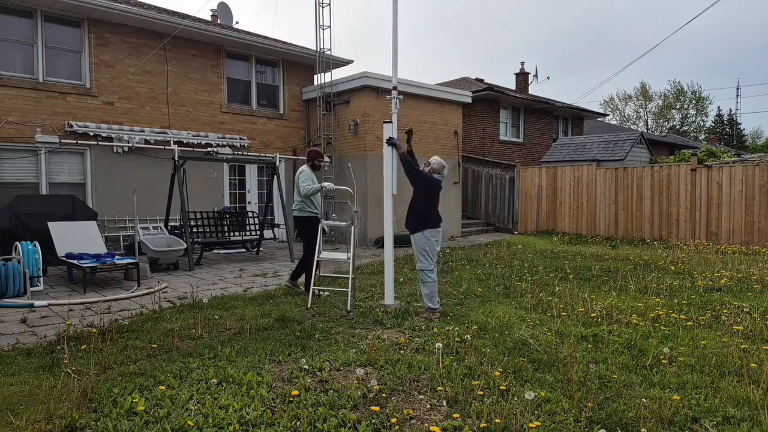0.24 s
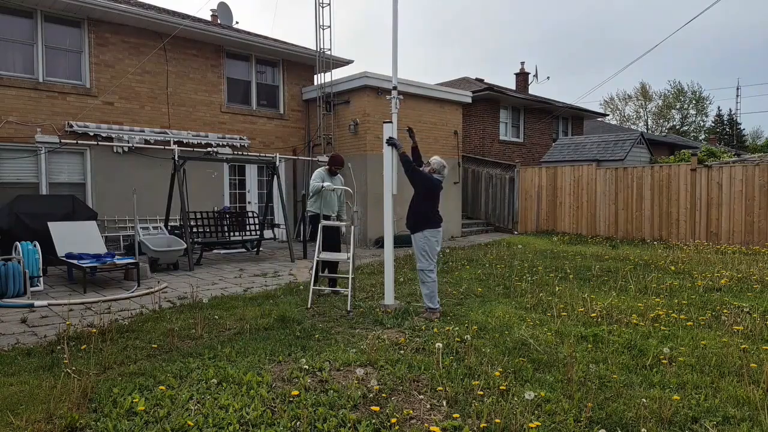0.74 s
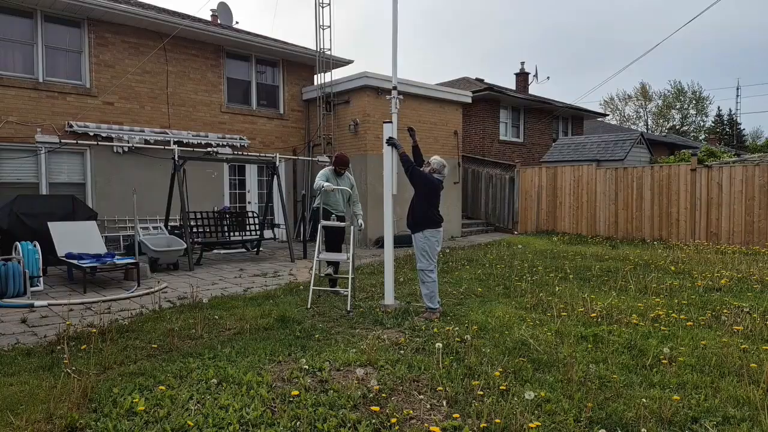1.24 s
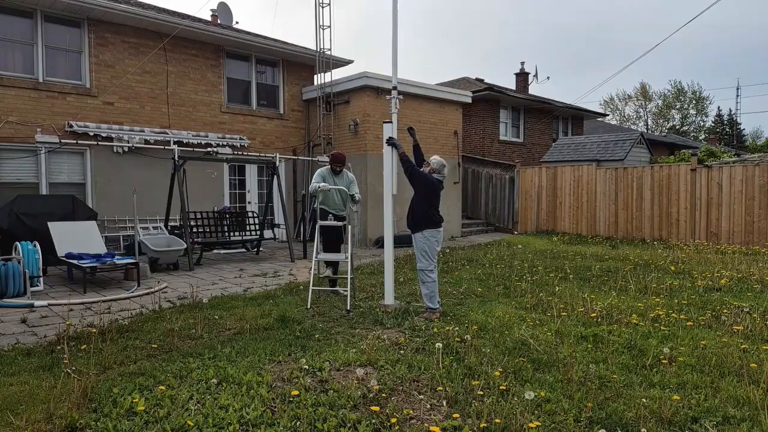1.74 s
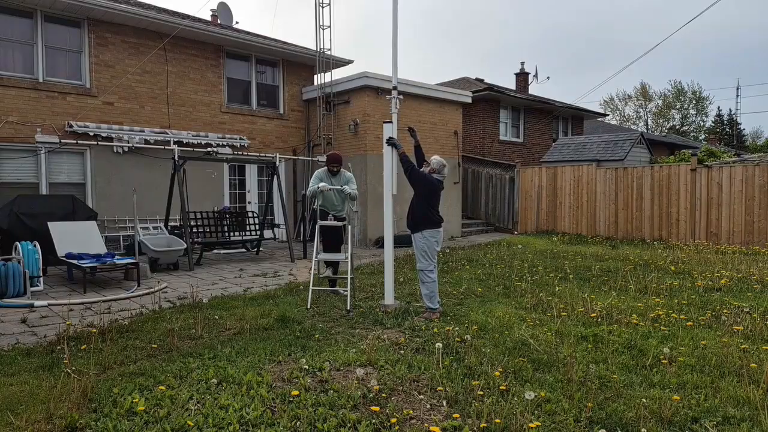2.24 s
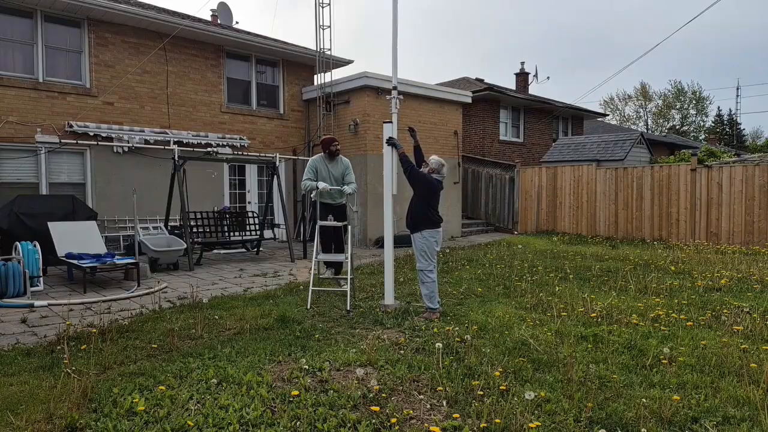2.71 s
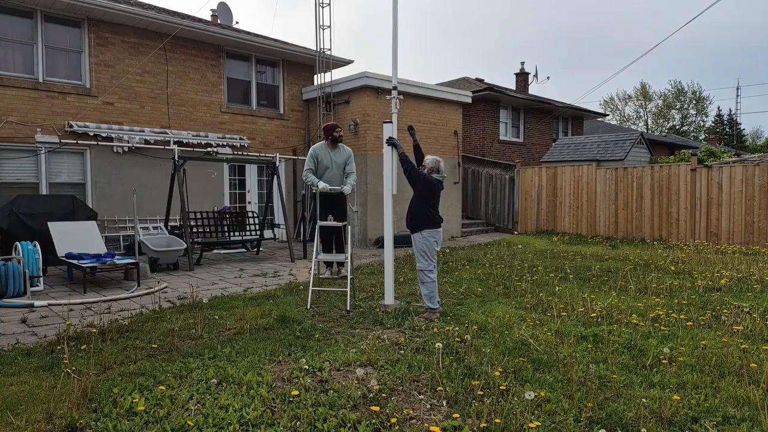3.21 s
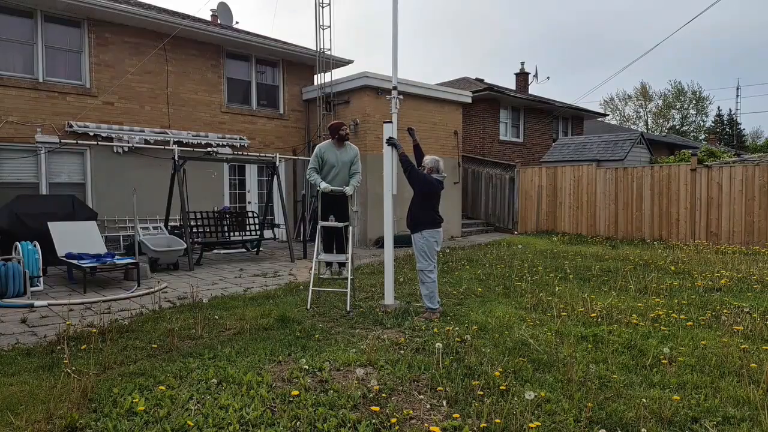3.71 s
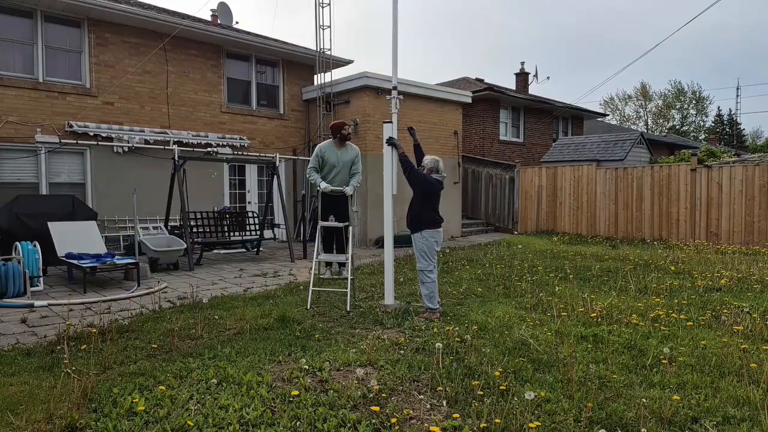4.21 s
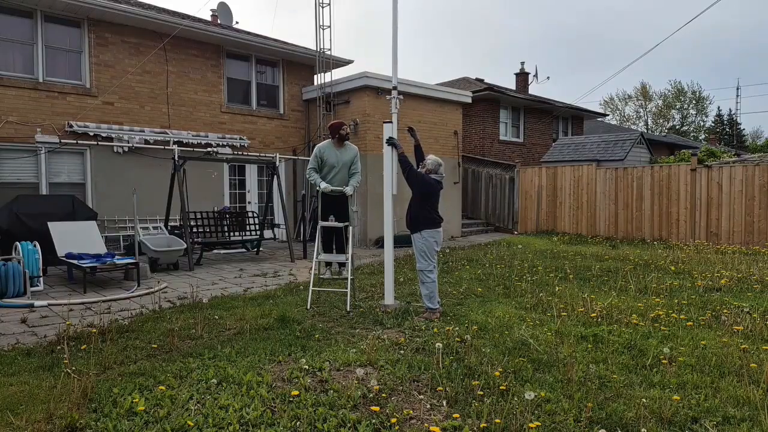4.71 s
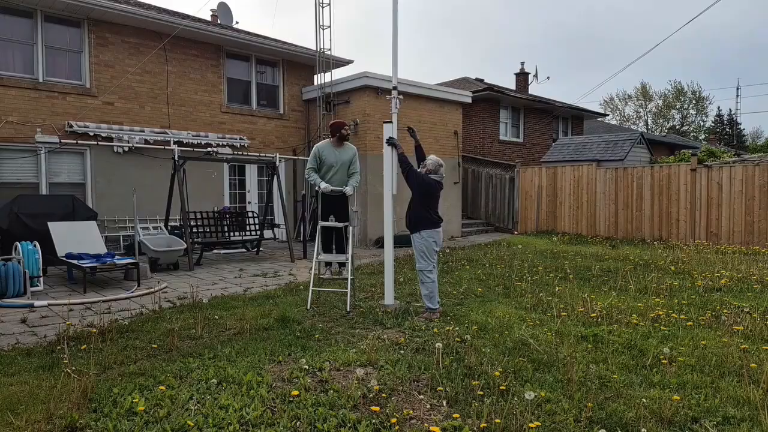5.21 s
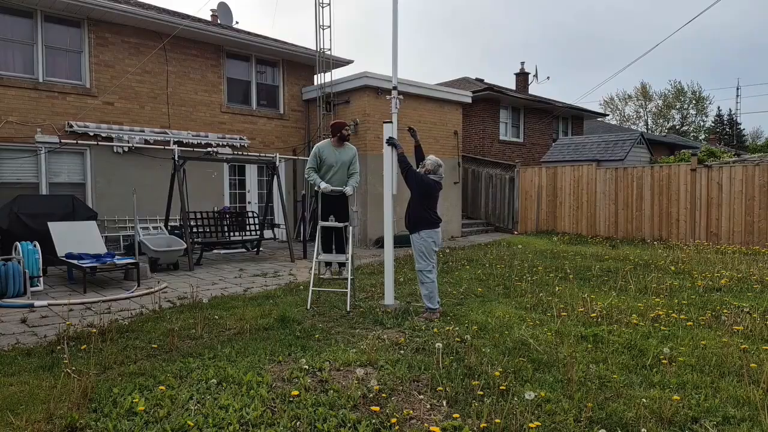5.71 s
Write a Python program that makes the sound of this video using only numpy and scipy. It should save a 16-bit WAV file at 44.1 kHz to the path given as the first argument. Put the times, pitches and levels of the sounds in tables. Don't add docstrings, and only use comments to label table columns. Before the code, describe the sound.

A metal tube clinks and rings briefly against its clamps in a backyard, with small clicks, bird chirps and distant low traffic rumble.

```python
import sys
import numpy as np
from scipy import signal
from scipy.fft import rfft, irfft
from scipy.io import wavfile
from scipy.ndimage import uniform_filter1d

SR = 44100
rng = np.random.default_rng(int(sys.argv[2]) if len(sys.argv) > 2 else 0)


def unload_wav(signal):
    wavfile.write(
        sys.argv[1],
        SR,
        np.round(np.clip(np.atleast_2d(signal).T, -1, 1) * 32767).astype(np.int16),
    )


def level_to_linear(level):
    exponent = np.asarray(level, float) / 20
    return 10 ** exponent


N = 262395
TIME = np.arange(N) / SR
CUTOFF_HZ = 16900
BIRD_PAN_DB = 2


def rms_one(x):
    return x / np.sqrt(np.mean(x ** 2) + 1e-20)


def at_hz(points, hz):
    points_hz, values = np.transpose(points)
    return np.interp(np.log(hz), np.log(points_hz + 1e-9), values)


def filtered(x, order, edge_hz, kind):
    return signal.sosfilt(signal.butter(order, edge_hz, kind, fs=SR, output="sos"), x)


def drift(rate_hz):
    r = np.exp(-80 * np.pi * rate_hz / SR)
    slow = signal.lfilter([1], [1, -2 * r, r * r], rng.standard_normal(N // 40 + 2002))[2000:]
    return np.interp(np.arange(N) / 40, np.arange(len(slow)), rms_one(slow))


def ring(force, hz, t60_s):
    r = level_to_linear(-60 / (t60_s * SR))
    w = 2 * np.pi * hz / SR
    return signal.lfilter([0, np.sin(w)], [1, -2 * r * np.cos(w), r * r], force + 1e-18)


def contacts(times, lengths, levels_db, grain_db):
    out = np.zeros(N)
    for start_s, length_s, level_db in zip(times, lengths, levels_db):
        age = np.arange(9000) / SR / max(length_s, .002)
        grains = rng.standard_normal(9000) * level_to_linear(grain_db * rng.standard_normal(9000))
        swell = np.minimum(2.19 * age, 1) ** 2 * np.exp(-age ** 2)
        chatter = level_to_linear(level_db) * rms_one(grains) * swell
        at = max(round(start_s * SR), 0)
        out[at:at + 9000] += chatter[:N - at]
    return out


def place(x, pan_db, lag):
    cycles = np.arange(N // 2 + 1) / N
    left = irfft(rfft(x) * np.exp(-2j * np.pi * cycles * lag), N)
    return np.array([left * level_to_linear(pan_db / 2), x * level_to_linear(-pan_db / 2)])


def rumble():
    # pitch_hz, level_db (per Hz)
    colour = [(12, -70), (20, -49), (43, -22), (50, -10), (63, -5.5), (81, -0.5), (146, -18), (216, -16.5),
              (328, -42.5), (367, -23), (660, -34), (949, -32.5), (3530, -68.5), (5680, -80),
              (16000, -69.5)]
    # pitch_hz, likeness (0 to 1)
    likeness = [(60, 0.86), (125, 0.95), (250, 0.85), (500, 0.5), (1000, 0), (3000, 0.06), (12000, 0.)]
    # pitch_hz, left_minus_right_db
    left_db = [(60, 0.5), (240, 0.5), (950, 0.5), (3770, -4.5), (15000, -6.5)]
    out = 0
    edges_hz = 22 * 2 ** np.arange(0, 9.7, .4)
    gust = drift(2.3)
    white = rng.standard_normal((2, 2, N + SR // 4))
    for k, (low, high) in enumerate(zip(edges_hz, edges_hz[1:])):
        mid, side = filtered(white[k % 2], 2, [low, high], "band")[:, SR // 4:]
        centre = np.sqrt(low * high)
        alike = np.clip(at_hz(likeness, centre), -1, 1)
        tilt_db = at_hz(left_db, centre) / 2 * np.array([[1], [-1]])
        gain = level_to_linear(at_hz(colour, centre) + 1.0 * drift(2.8) + 0.81 * gust + tilt_db)
        out = out + gain * (np.sqrt(1 + alike) * mid + np.sqrt(1 - alike) * side * [[1], [-1]])
    out = filtered(out, 2, 6100, "low")
    steady_db, passing_s, passing_width_s, passing_db = -48, 5.48, 0.16, 3.0
    level_db = steady_db + passing_db * np.exp(-((TIME - passing_s) / passing_width_s) ** 2)
    return level_to_linear(level_db + 14.5) * rms_one(out)


def engine():
    # time_s, level_db
    labour = [(0., -34), (1.2, -34.5), (2., -30), (2.7, -31), (3.3, -38), (4.2, -42), (4.9, -30.5),
              (5.95, -42.5)]
    # order (times the engine rate), level_db
    orders = [(2, -12), (3, 0.), (4, -12), (5, -16), (6, -16)]
    rate_hz, waver_hz = 27.19, 0.899
    drone_db = np.interp(TIME, *np.transpose(labour))
    phase = 2 * np.pi * np.cumsum(rate_hz + waver_hz * drift(7.5)) / SR
    drone = 0
    for order, db in orders:
        drone = drone + level_to_linear(drone_db + db + 1.9 * drift(28)) * np.sin(round(order) * phase)
    return place(drone, pan_db=2.5, lag=7.8)


def voice(hz):
    overtones_db = (-27, -34)
    phase = 2 * np.pi * np.cumsum(hz) / SR
    second = level_to_linear(overtones_db[0]) * np.sin(2 * phase)
    third = level_to_linear(overtones_db[1]) * np.sin(3 * phase) * (3 * hz < CUTOFF_HZ)
    return np.sin(phase) + second + third


def songbird():
    # time (share of the span), pitch (share of crest), level_db
    motif = [(-.36, .88, -40), (-.19, .8, -15), (0., 1., 0.), (.2, .86, -10), (.42, .91, -3), (.64, .7, -7),
             (.8, .59, -26), (.99, .95, -5), (1.09, .98, -16)]
    undervoice = [(.85, .64, -24), (1., .76, -6), (1.12, .79, -22)]
    pip = [(0., 1., -9.5), (.3, 1.02, 1), (.8, .99, -6), (1., 0.834, -15)]
    # crest_s, span_s, crest_hz, level_db, crest_accent_db
    songs = [
        (2.776, .184, 4890, -56, 8.),
        (3.508, .204, 4860, -53, 9.),
        (4.138, .187, 5060, -49, -2.),
        (5.078, .217, 4600, -51, -1.),
    ]
    pips = [
        (3.831, 0.044, 2890, -67.5, 0.),
        (4.379, 0.025, 2780, -70, 0.016),
        (4.98, 0.029, 3100, -73, 0.),
    ]
    out = np.zeros(N)
    for shape, sung in ((motif, songs), (undervoice, songs), (pip, pips)):
        share, pitch_share, shape_db = np.transpose(shape)
        for crest_s, span_s, hz, level_db, accent_db in sung:
            first, last = crest_s + span_s * share[0], crest_s + span_s * share[-1]
            at = slice(round(first * SR), round(last * SR))
            u = (TIME[at] - crest_s) / span_s
            pitch_hz = uniform_filter1d(hz * np.interp(u, share, pitch_share), size=400, mode="nearest")
            stress_db = np.interp(u, share, shape_db) + accent_db * np.exp(-(u / 0.096) ** 2)
            fade = signal.windows.tukey(len(u), .06)
            out[at] += level_to_linear(level_db + stress_db + 10) * fade * voice(pitch_hz)
    return out * level_to_linear(2.94 * drift(60))


def sparrow():
    # start_s (into the call), length_s, top_hz, falls_to_hz, level_db
    lead_call = [(0., .019, 4780, 4100, -8), (.006, .036, 6850, 4300, -12), (.074, .02, 5100, 3900, 0.)]
    double_call = [(0., .035, 6330, 4000, 0.), (.035, .044, 6700, 5300, -5)]
    # start_s, pitch_factor, level_db, extra_db of the last note
    leads = [
        (.329, .985, -39, 1.),
        (1.961, 1.01, -31, 0.),
    ]
    doubles = [
        (-.065, .96, -44, 0.),
        (.462, 1.005, -39, 0.),
        (1.752, .98, -34.5, 4.),
        (2.104, 1., -34, -1.),
    ]
    foot_hz, arch_power, arch_edge = 4200, 2.5, 15
    out = np.zeros(N + SR)
    for notes, calls in ((lead_call, leads), (double_call, doubles)):
        for start_s, pitch, call_db, last_db in calls:
            for note in notes:
                note_s, length_s, top_hz, to_hz, note_db = note
                u = np.linspace(-1, 1, round(length_s * SR))
                end_hz = np.where(u < 0, foot_hz, to_hz)
                hz = top_hz - (top_hz - end_hz) * np.abs(u) ** arch_power
                swell = (1 - np.abs(u) ** arch_edge) ** .8 * level_to_linear(4.0 * u)
                level_db = call_db + note_db + last_db * (note is notes[-1])
                at = round((start_s + note_s) * SR) + SR
                out[at:at + len(u)] += level_to_linear(level_db) * swell * voice(pitch * hz)
    return out[SR:] * level_to_linear(-3.74 + 1.4 * drift(74))


def scuffs():
    # start_s, level_db, length_s
    slides = [(0., -65.5, 0.23), (0.319, -55.5, 0.03), (0.41, -80, 0.025), (0.49, -65, 0.36),
              (1.364, -52, 0.14), (1.52, -55, 0.17), (2.093, -48, 0.044), (2.671, -53.5, 0.09),
              (3.25, -57.5, 0.029), (3.467, -51.5, 0.044), (4.041, -54.5, 0.029), (4.1, -65, 0.03),
              (4.979, -57.5, 0.037), (5.413, -58, 0.088)]
    start_s, level_db, length_s = np.transpose(slides)
    return filtered(contacts(start_s, length_s, level_db, grain_db=1.5), 1, [1500, 9000], "band")


def snaps():
    # start_s, bright_peak_db, dull_knock_db, length_s, left_minus_right_db
    clicks = [(0, -47, -78, 0.012, 16), (0.725, -35, -50, 0.012, 3), (1.33, -60, -44.5, 0.02, -2),
              (1.34, -31.5, -34.5, 0.011, 0), (1.671, -31, -43.5, 0.01, 6), (1.953, -42.5, -49, 0.018, -2),
              (2.305, -26.5, -46, 0.01, 7), (2.841, -24.5, -39, 0.011, -4),
              (3.0215, -24.5, -37.5, 0.01, -3), (3.361, -68, -50, 0.015, -2), (3.414, -49, -60, 0.032, -5),
              (3.71, -40.5, -54.5, 0.015, -7.5), (4.237, -31, -47.5, 0.0077, 3),
              (4.286, -40.5, -53, 0.011, -3.5), (4.688, -28, -43, 0.009, 7),
              (4.738, -34.5, -63, 0.0085, 18), (4.757, -29.5, -43.5, 0.018, 1),
              (4.854, -31.5, -45.5, 0.013, 11), (5.161, -28, -45, 0.02, 0), (5.5615, -77, -49.5, 0.022, 8)]
    # pitch_hz, level_db (per Hz)
    crackle_colour = [(1530, -22), (2600, -10.5), (2960, 2), (3520, 0.5), (4890, 1), (8980, -0.5),
                      (9840, 1.5), (11100, -5), (14300, 3.5), (16000, -22)]
    # pitch_hz, width_hz, level_db
    faint_rings = [(8600, 100, -12), (10600, 120, -6.5), (13100, 150, -30)]
    start_s, bright_db, knock_db, length_s, pan_db = np.transpose(clicks)
    crackle = contacts(start_s - .002, length_s, bright_db - 16.0, grain_db=5.5)
    colour = level_to_linear(at_hz(crackle_colour, np.linspace(1, SR / 2, 65)) + 9.5)
    taps = signal.minimum_phase(signal.firwin2(129, np.linspace(0, 1, 65), colour ** 2))
    bright = signal.lfilter(taps, 1, crackle)
    rings = sum(level_to_linear(db - 18.5) * ring(crackle, hz, 0.74 / width_hz) for hz, width_hz, db in faint_rings)
    thud = contacts(start_s - .002, length_s, knock_db - 0.5, grain_db=1.0)
    knock_hz, knock_width_hz = 2120, 370
    knock = level_to_linear(-10.5) * ring(thud, knock_hz, 1.04 / knock_width_hz)
    knock += level_to_linear(1.5) * filtered(thud, 1, [1200, 4500], "band")
    latest = np.clip(np.searchsorted(start_s, TIME + 0.0075) - 1, 0, None)
    return bright + rings + knock, pan_db[latest]


def strike(force, times, modes, uneven_db):
    latest = np.clip(np.searchsorted(times, TIME) - 1, 0, None)
    shares = level_to_linear(uneven_db * rng.standard_normal((len(times), len(modes))))
    out = 0
    for k, (hz, db, t60_s) in enumerate(modes):
        out = out + level_to_linear(db) * ring(force * shares[latest, k], hz, t60_s)
    return out


def tube():
    # start_s, ring_peak_db, low_body_db,
    # hard_contact_db
    clinks = [(0.68, -60, -74, -53), (1.014, -58.5, -60, -72), (1.576, -47.5, -53, -81),
              (1.625, -50, -69, -77), (1.692, -42.5, -58, -68), (2.16, -44, -38, -52),
              (2.219, -72, -65, -69), (2.27, -51, -56, -59), (2.629, -54, -43.5, -83),
              (2.66, -37.5, -32.5, -44.5), (2.704, -43, -32, -61), (2.802, -50, -44, -47),
              (2.847, -15.5, -30, -34), (2.895, -34, -43, -59), (3.036, -27, -22.5, -63),
              (3.069, -35, -31, -54), (3.104, -52, -60, -62), (3.223, -60.5, -81, -50),
              (4.575, -65, -67.5, -79.5), (5.406, -47, -44, -80), (5.442, -34.5, -38.5, -64),
              (5.519, -39, -31.5, -58), (5.533, -36.5, -28.5, -47), (5.69, -63, -39.5, -84),
              (5.751, -69, -69, -108), (5.836, -26.5, -28.5, -55), (5.865, -25, -29, -31),
              (5.888, -36, -35, -56), (5.928, -39, -50, -48)]
    # pitch_hz, level_db, t60_s
    body_modes = [(430, -10, .08), (762, 0, .12), (830, -5, .06), (890, -6, .09), (963, -5, .1),
                  (1038, -5, .1), (1147, -4, .07), (1358, -5, .06), (1560, -8, .05), (1834, -2, .05),
                  (2150, -10, .05), (2550, -11, .04)]
    # pitch_hz, level_db, t60_s
    wall_modes = [(3080, -21, .04), (3400, -15, .05), (3560, -17, .05), (4170, -17, .06), (4425, -13, .09),
                  (4500, -10, .08), (4535, -12, .4), (4548, 3, .085), (4572, -15, .3), (4650, -11, .08),
                  (4990, -15, .07), (5200, -15, .07)]
    # pitch_hz, level_db, t60_s
    clamp_modes = [(6380, -8, .12), (7040, -5, .12), (8300, -4, .1), (8440, 0, .14), (10480, -9, .1),
                   (12340, -5, .1), (12400, 0, .2), (12570, -6, .1), (12710, -6, .1), (14400, -9, .08)]
    start_s, ring_db, body_db, hiss_db = np.transpose(clinks)
    length_s = 0.014 * level_to_linear(2.0 * rng.standard_normal(len(start_s)))
    wall = contacts(start_s, 1.39 * length_s, ring_db - 25, grain_db=2.0)
    wall = strike(wall, start_s, wall_modes, uneven_db=2.5)
    wall = wall * level_to_linear(5 * drift(52))
    dull = contacts(start_s + .005, 2.76 * length_s, body_db - 33.5, grain_db=4.0)
    body = strike(dull, start_s, body_modes, uneven_db=3.0)
    rattle = level_to_linear(25) * filtered(dull, 1, [700, 4200], "band")
    ring_share = .6
    clamp_db = ring_share * ring_db + (1 - ring_share) * hiss_db - 19
    clamp = contacts(start_s, length_s, clamp_db - 15, grain_db=2.0)
    clamp = strike(clamp, start_s, clamp_modes, uneven_db=3.0)
    hiss = filtered(contacts(start_s, 2.2 * length_s, hiss_db - 2, grain_db=4.0), 2, 3500, "high")
    return wall + body + rattle + clamp + hiss


def yard(x):
    # delay_s, level_db, smear_s
    bounces = [
        (0.012, -2.5, 0.013),
        (.03, -38.5, 0.023),
        (.055, -12.5, .015),
        (0.073, -15.5, 0.023),
    ]
    t60_s, tail_db, tail_cut_hz = 0.81, -4, 11300
    age = TIME[:SR // 2]
    echoes = 0
    for delay_s, db, smear_s in bounces:
        echoes = echoes + level_to_linear(2 * db) * np.exp(-((age - delay_s) / smear_s) ** 2) / smear_s / np.sqrt(np.pi)
    decay = 2 * np.log(1000) / t60_s * level_to_linear(-120 * age / t60_s)
    tail = level_to_linear(2 * tail_db) * decay * np.minimum(age / 0.0033, 1)
    early, late = rng.standard_normal((2, 2, len(age))) / np.sqrt(SR)
    late = filtered(late, 1, tail_cut_hz, "low")
    response = early * np.sqrt(echoes) + late * np.sqrt(tail)
    return signal.fftconvolve(x[None], response, axes=1)[:, :N]


def scene():
    background = rumble() + engine()
    song = songbird()
    chirps = sparrow()
    clicks, clicks_pan_db = snaps()
    clicks = clicks + scuffs()
    metal = tube()
    direct = place(metal, pan_db=2.5, lag=-2.25) + place(clicks, clicks_pan_db, lag=3.4)
    direct += place(chirps, BIRD_PAN_DB, lag=0.81) + place(song, BIRD_PAN_DB, lag=-2.6)
    wet = level_to_linear(-3.0) * metal + level_to_linear(7.5) * clicks + chirps + level_to_linear(-3.0) * song
    return direct + yard(wet) + background


def denoise(x):
    # threshold_db, deepest_cut_db, share of the loudest treble that opens all bands
    gate = (-80.5, -28.5, 0.036)
    threshold_db, cut_db, share = gate
    hz, _, bins = signal.stft(x, SR, nperseg=1024)
    power = np.mean(np.abs(bins) ** 2, axis=0)
    power = uniform_filter1d(uniform_filter1d(power, size=9, axis=0), size=3, axis=1)
    power = power + share * power[hz > 5200].max(axis=0)
    gain = level_to_linear(cut_db) + (1 - level_to_linear(cut_db)) * power / (power + level_to_linear(2 * threshold_db))
    gain = np.where(hz[:, None] > 1500, gain, 1)
    return signal.istft(bins * gain, SR)[1][:, :N]


def low_pass(x):
    return signal.sosfilt(signal.butter(12, 16410, fs=SR, output="sos"), x)


def record(dry):
    hiss = level_to_linear(-59.5) * rng.standard_normal(dry.shape)
    clean = denoise(dry + hiss)
    mix = signal.sosfilt(signal.cheby2(12, 70, CUTOFF_HZ, fs=SR, output="sos"), clean)
    return low_pass(mix)


dry = scene()
out = record(dry)
unload_wav(out)
```